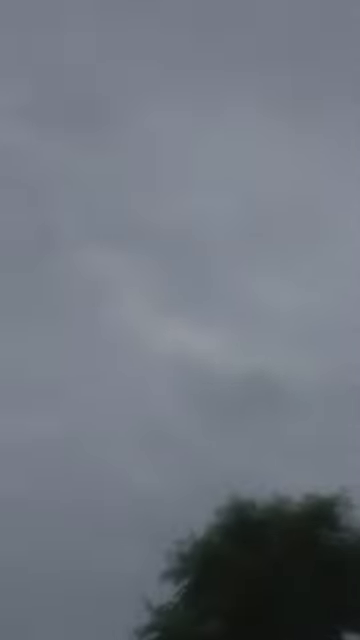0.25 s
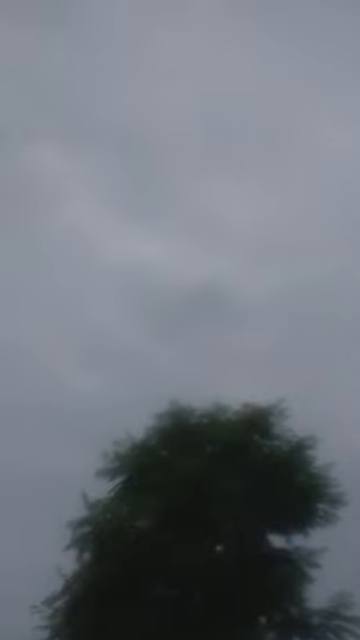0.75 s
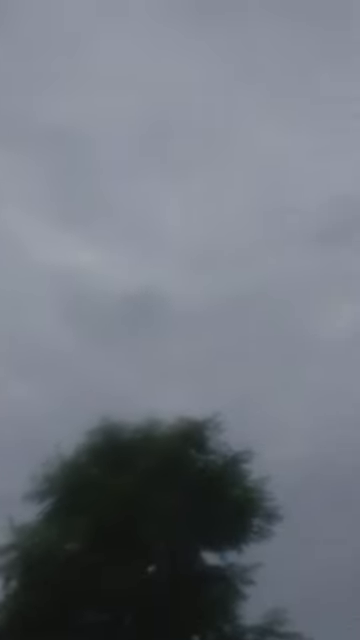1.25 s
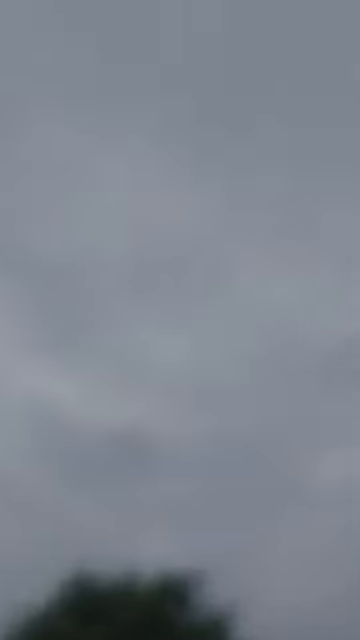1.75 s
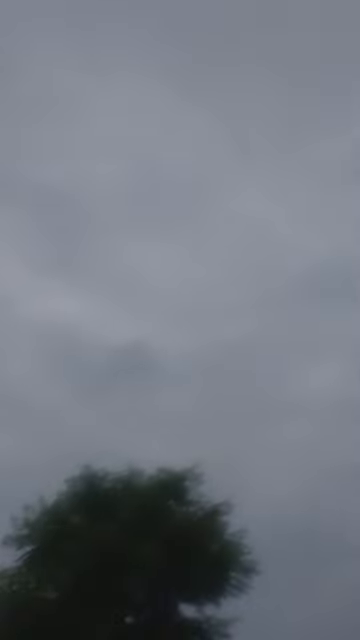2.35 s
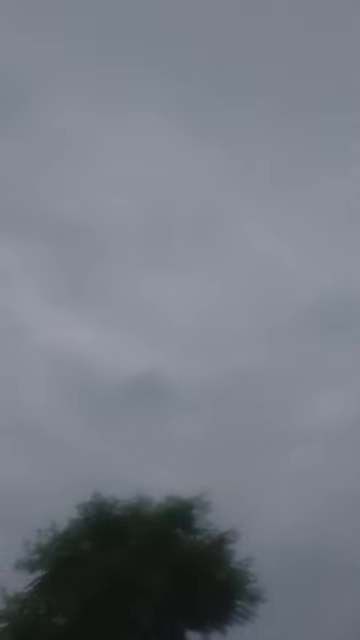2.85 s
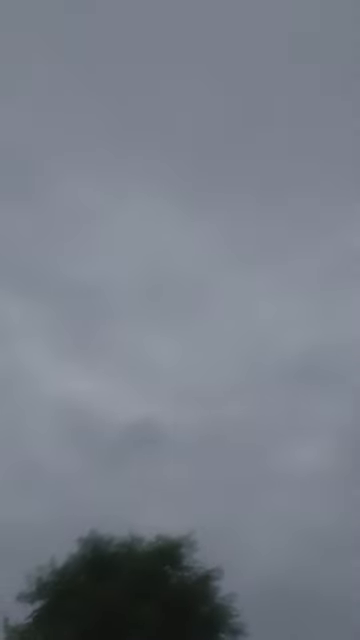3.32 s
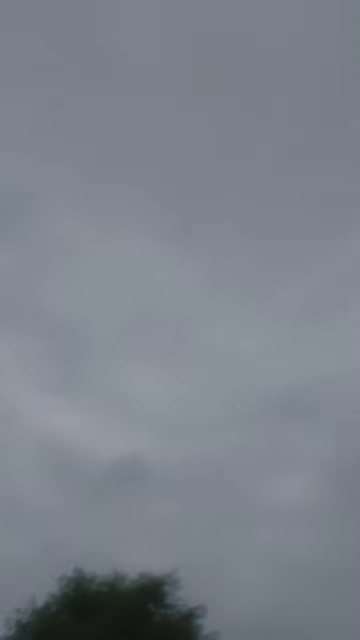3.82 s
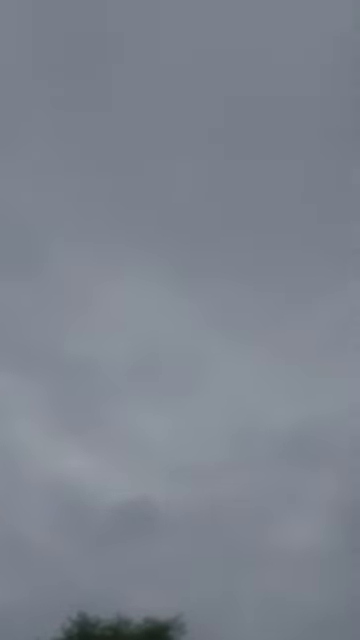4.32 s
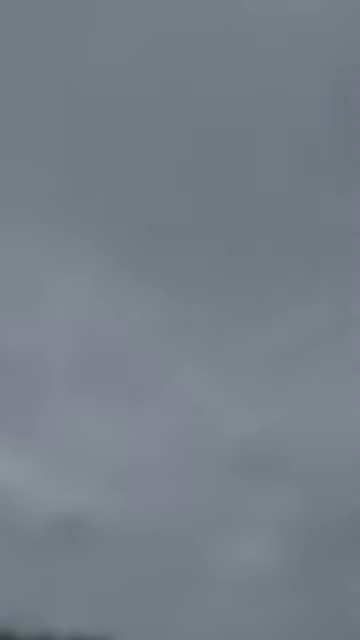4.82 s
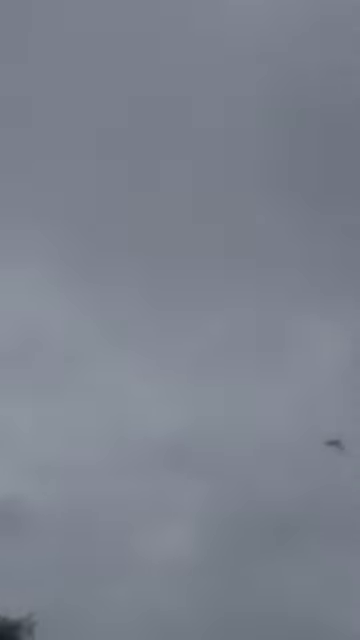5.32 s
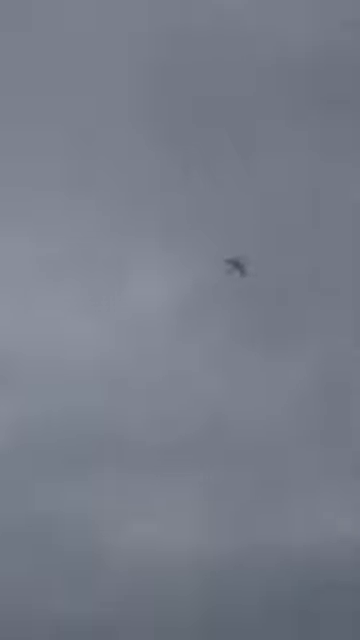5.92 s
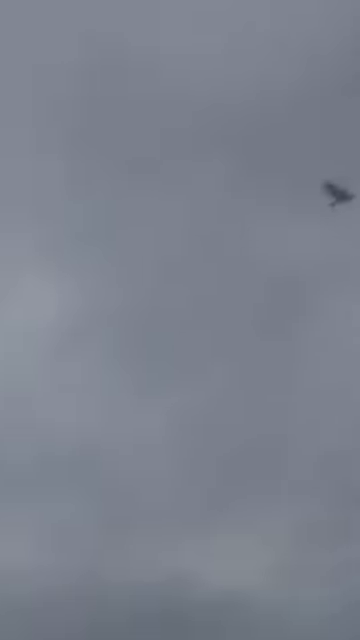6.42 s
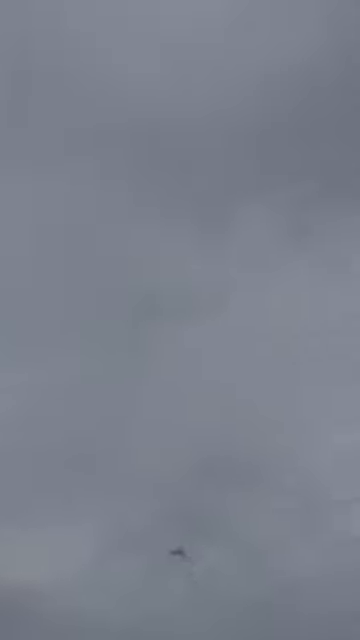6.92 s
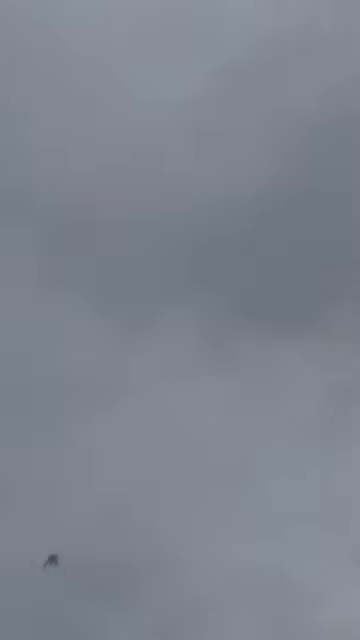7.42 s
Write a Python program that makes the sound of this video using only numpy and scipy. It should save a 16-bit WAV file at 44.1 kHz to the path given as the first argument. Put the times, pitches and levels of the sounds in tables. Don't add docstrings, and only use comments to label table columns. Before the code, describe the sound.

A crow is already mid-caw at the start; a loud, rattling near caw follows at 0.3 s, overlapped by another at 0.6, then more at 1.0 and 1.5, with a hazy far flock echoing among trees. Wind rumbles on the hand-held microphone, and small birds chip and trill faintly. A burst of finger ticks and a knock comes around 1.8-1.9. The breeze drops from 2.3 to 3; softer caws, short croaks and hoarse, sinking yelps alternate, strongest at 3.5 and 3.9. Crows caw at 3.8 and 4.7; a sharp click and gust hit at 4.1, with crackles after. A motorbike putters in faintly from 3.9, tyres passing near 6.2, its whine falling after 6.5 as it slows to idle. From 5.5 a small bird repeats a rapid whistled phrase, growing louder. Strong caws sound at 6.4 and 7.1, with cloth swishes and a final knock at 7.1.

```python
import sys
import numpy as np
from scipy import signal
from scipy.fft import rfft, irfft, next_fast_len
from scipy.io import wavfile
from scipy.ndimage import uniform_filter1d, map_coordinates

SR = 44100
rng = np.random.default_rng(int(sys.argv[2]) if len(sys.argv) > 2 else 0)


def boost(x):
    u = np.asarray(x, float) / 20
    return 10 ** u


def materialize(psi):
    bounded = np.clip(np.atleast_2d(psi).T, -1, 1)
    quanta = np.round(bounded * 32767).astype(np.int16)
    wavfile.write(sys.argv[1], SR, quanta)


N = 337806
T = np.arange(N) / SR

# (frequency [Hz], density [dB per Hz])
TRAFFIC = [(71, -28), (120, -3), (276, -1), (603, -6.5), (720, -7), (915, -4.5), (1000, -8.5), (1300, -6),
           (2200, -120)]
# (frequency [Hz], density [dB per Hz])
FRICTION = [(1180, -51.5), (2000, -1), (2460, -5), (2980, -2), (3980, -4.5), (4260, -2), (5030, -2.5),
            (6090, -12.5), (7060, -23.5), (8550, -29), (10600, -22.5), (12900, -19), (16000, -22)]


def level(x, db):
    return x * boost(db) / np.sqrt(np.mean(x ** 2))


def colour(x, points):
    hz, db = np.transpose(points)
    size = next_fast_len(len(x))
    f = np.arange(size // 2 + 1) * SR / size + 1
    gain = boost(np.interp(np.log(f), np.log(hz), db, left=-90, right=-90))
    return irfft(rfft(x, size) * gain, size)[:len(x)]


def walk(rate, size=N):
    k = max(int(SR / rate), 1)
    steps = np.repeat(rng.standard_normal(size // k + 1), k)
    return 1.3 * uniform_filter1d(uniform_filter1d(steps, k), k)[:size]


def add(out, s, x):
    i = int(s * SR)
    x, i = x[max(-i, 0):], max(i, 0)
    out[i:i + len(x)] += x[:len(out) - i]


def fade(size, edge_s):
    i = np.arange(size)
    return np.clip(np.minimum(i, size - i) / (edge_s * SR), 0, 1)


def trees(x, t60, db):
    t = T[:SR]
    tail = rng.standard_normal(SR) * boost(-60 * t / t60) * np.clip(t / .03, 0, 1)
    return x + boost(db) * signal.fftconvolve(x, tail / np.sqrt(np.sum(tail ** 2)))[:N]


def syrinx(hz, rattle_hz, rough, swing=.066, depth=.35):
    size = len(hz)
    rattle = 2 * np.pi * np.cumsum(rattle_hz * (1 + 0.2 * rough * walk(60.4, size))) / SR
    flutter = 1 + swing * np.sin(rattle) + 0.0389 * rough * walk(300, size)
    phase = 2 * np.pi * np.cumsum(hz * flutter) / SR
    tone = np.zeros(size)
    for k in range(1, 31):
        overtone = np.cos(k * phase + .4 * k * k)
        if k < 9:
            overtone = overtone * boost(1.6 * walk(13, size))
        tone += overtone / np.sqrt(15)
    breath = rng.standard_normal(size) * (1 + 1.9 * np.cos(phase))
    return (1 + depth * np.cos(rattle + .8)) * (tone + .95 * rough * breath)


def crows():
    # (crow, time [s], length [s], level [dB], brightness [dB])
    caws = [("first", -.3, .43, -32, -6), ("near", .338, .32, -29, -7), ("behind", .57, .22, -33.5, -15.5),
            ("mate", 1.025, .41, -31.5, -10.5), ("quick", 1.53, .3, -37, -15), ("low", 2.13, .3, -45, -21),
            ("far", 2.63, 0.28, -56.5, -21), ("busy", 3.83, .37, -36, -13), ("again", 4.67, .36, -40, -17),
            ("high", 5.75, .32, -48.5, -12), ("sharp", 6.4, .285, -33, -11),
            ("last", 7.07, .47, -34.5, -14)]
    voices = {"near": (510, 75, 0.16, 0.99, 1.5, .14, 0.37, 8.9),
              "mate": (505, 79, 0.36, 0.97, -1, -.03, .65, 15.5),
              "busy": (505, 70, .2, 1.05, 0, .04, .5, 10), "quick": (518, 92, .2, .94, -9, -.04, 0.5, 14.5),
              "low": (492, 70, 0.36, 0.98, -3, 0.15, .55, 10.5),
              "far": (480, 70.5, 0.1, 1.05, -4, .01, -1, 13),
              "sharp": (505, 74, .16, 1.29, 2, .14, 0.29, 18),
              "last": (512, 78, .2, 1.046, 5.8, .03, 0.47, 25),
              "first": (510, 75, 0.21, 0.983, 1.8, .05, .4, 17),
              "behind": (500, 75, .25, .95, 6.7, .01, 0.35, 34),
              "again": (490, 75, .16, 1.03, 1.5, .08, 0.39, 13.4),
              "high": (480, 70, 0.4, 1, -5.5, .03, 0.6, 8)}
    leans = {"quick": (-9, 8), "sharp": (-1, 9), "busy": (4, 0), "again": (2, -3), "mate": (-2, 0)}
    # (frequency [Hz], density [dB per Hz])
    throat_shape = [(410, -58), (700, -29.5), (798, -29.5), (904, -9.5), (1050, -6.5), (1250, -4.5),
                    (1490, -1), (1660, 5.5), (1940, 4.5), (2270, -6), (3100, -26), (4030, -55),
                    (6820, -120)]
    # (frequency [Hz], density [dB per Hz])
    beak_shape = [(1760, -35), (3000, -6.5), (3260, -18), (3780, 1.5), (4080, -3.5), (4500, -11),
                  (5200, -3.5), (5750, -10), (6500, -19.5), (7720, -31.5), (8340, -43), (9940, -49),
                  (11000, -36.5), (14300, -30), (16000, -40.5)]
    # (time [s], length [s], pitch [Hz], level [dB])
    croaks = [
        (0.163, 0.1, 567, -50),
        (2.476, 0.097, 596, -53),
        (2.921, 0.13, 600, -52),
        (3.05, 0.16, 642, -61),
        (3.356, .13, 596, -43.5),
        (3.802, 0.12, 599, -49),
        (4.281, 0.13, 596, -50),
    ]
    # (frequency [Hz], density [dB per Hz])
    croak_shape = [(410, -45.5), (700, -27.5), (1070, -11.5), (1170, -2), (1490, -9), (1620, -12.5),
                   (1760, 0), (2740, 0), (3310, -24.5), (4170, -41), (5000, -39.5), (6500, -70),
                   (11000, -120)]
    attack_s, release_s = 0.087, 0.086
    pitch_rise, pitch_fall = .13, .15
    throat_sinks_db = 4
    beak_shuts_s, beak_opens_db = 0.064, 12
    out = np.zeros(N)

    def throat_at(voice, crow, tilt_db):
        chest_db, nasal_db = leans.get(crow, (0, 0))
        shape = []
        for hz, g in throat_shape:
            lean_db = chest_db * (hz < 1200) + nasal_db * (hz > 2250)
            shape.append((hz, g + lean_db + tilt_db * max(np.log2(hz / 1600), -.25)))
        return level(colour(voice, shape), 0)

    for crow, s, length, db, bright_db in caws:
        top_hz, rattle_hz, rough, stretch, tilt_db, rise, open_at, sag_db = voices[crow]
        t = T[:int(length * SR)]
        u = t / length
        edges = np.minimum(np.minimum(t / attack_s, (length - t) / release_s), 1)
        swell = edges * boost(-sag_db * t)
        bend = pitch_rise + (pitch_fall - pitch_rise) * u
        arch = 1 - bend * (1 - np.sin(np.pi * u ** .62) ** .85)
        voice = syrinx(np.full(2 * len(t), 1. * top_hz), rattle_hz, rough)
        rasp = (voice + .6 * rng.standard_normal(len(voice))) * boost(1.5 * walk(45, len(voice)))
        sinking = np.clip(np.arange(len(voice)) / len(t), 0, 1)
        throat = (1 - sinking) * throat_at(voice, crow, tilt_db + throat_sinks_db)
        throat += sinking * throat_at(voice, crow, tilt_db - throat_sinks_db)
        beak = [(hz * stretch if hz < 9000 else hz, g) for hz, g in beak_shape]
        bright = level(colour(rasp, sorted(beak)), 0)
        place = [np.cumsum(arch)]
        gape = [np.cumsum(np.sqrt(arch) * (1 + rise * (u - .5)))]
        opening = boost(bright_db - beak_opens_db * np.abs(u - open_at))
        opening = opening * np.clip((length - t) / beak_shuts_s, 0, 1)
        call = map_coordinates(throat, place) + opening * map_coordinates(bright, gape)
        add(out, s, call * boost(db + 1.5) * swell)
    for s, length, hz, db in croaks:
        u = np.linspace(0, 1, int(length * SR))
        voice = syrinx(hz * (1 - .03 * u), 60, 0.5, swing=0.04, depth=0.7)
        croak = level(colour(voice, croak_shape), db)
        add(out, s, croak * fade(len(u), 0.02) * boost(2.5 * walk(60, len(u))))
    return out


def yelps():
    # (time [s], length [s], second harmonic at start [Hz], second harmonic held [Hz],
    # level [dB], high overtones [dB])
    calls = [(1.931, 0.15, 1470, 1350, -49, -13), (2.07, 0.12, 1720, 1545, -43.5, 2),
             (2.574, 0.12, 1890, 1475, -49.5, 1.5), (2.628, .05, 1750, 1500, -52, -20),
             (2.66, .25, 1450, 1460, -56, -20), (3.022, 0.17, 1935, 1480, -40, -13),
             (3.466, 0.14, 1914, 1508, -34, -14), (3.937, .12, 1577, 1447, -31.5, -15),
             (4.405, 0.12, 1645, 1375, -39, 11), (4.44, 0.065, 1674, 1504, -44, -25),
             (2.17, 0.23, 1445, 1430, -54, -21)]
    # (multiple of the pitch, level [dB])
    overtones = [(3, -32), (4, -11), (5, -40), (6, -28), (8, -29)]
    overtone_db, pure_from_db, purer_per_db = -1, -41.5, 1
    rich_below_hz, richer_db_per_hz = 1450, .17
    drop_s, hoarse, flutter_db = .016, .015, 2.3
    out = np.zeros(N)
    for s, length, start_hz, held_hz, db, top_db in calls:
        odd_db = richer_db_per_hz * max(rich_below_hz - held_hz, 0)
        over_db = overtone_db - purer_per_db * max(db - pure_from_db, 0)
        t = T[:int(length * SR)]
        hz = held_hz * (1 - .35 * t) + (start_hz - held_hz) * np.exp(-t / drop_s)
        phase = np.pi * np.cumsum(hz * (1 + hoarse * walk(250, len(t)))) / SR
        tone = np.sin(2 * phase)
        onset = np.clip(t / .03, 0, 1) ** 2
        for k, g in overtones:
            high_db = ((k > 4) + .3 * (k == 4)) * top_db
            rich_db = ((k == 5) - 1. * (k == 8)) * odd_db
            decay = np.exp(-k * t / .65)
            tone += boost(g + over_db + high_db + rich_db) * decay * np.sin(k * phase) * onset
        swell = np.sin(np.pi * (t / length) ** .8) ** .55
        add(out, s, 1.6 * tone * swell * boost(db + flutter_db * walk(90, len(t))))
    return out


def hands():
    # (time [s], push length [ms], signed
    knocks = [(1.82398, .24, .8), (1.8293, 2.62, -.9), (4.08946, .55, -1.15), (7.0893, .22, -1.3),
              (7.08966, 2.31, -.45), (5.26084, .62, .37), (6.0533, .88, -.25), (4.33642, .84, .23),
              (7.43159, 1.13, .06), (1.82382, .08, .45), (4.08965, .09, -.6), (4.08932, .13, .55),
              (7.08926, .08, -.3), (7.08985, .15, -.2),
              (1.392, 2., .08), (2.501, 1.2, .018), (4.22, .9, .07), (4.645, 1.5, .05),
                   (5.101, 1.4, .06), (6.484, 1.4, .12), (1.875, 1.5, .08), (1.095, 1.1, .03),
                   (1.765, 1.1, .04), (2.13, .8, .006), (5.2605, .25, .07), (6.0537, .3, -.06)]
    # (corner [Hz], Q)
    low_cut = [(85, 1.48), (57.6, 3), (161, .75)]
    # (time [s], peak [dB], nail brightness [dB])
    finger_ticks = [(0.225, -35, -3), (1.778, -24, 0), (1.7924, -29, -3), (1.8114, -27, 12),
                    (1.818, -41, -6), (1.8408, -29, -6), (1.8773, -37, -3), (1.8895, -29, -6),
                    (1.913, -36, -3), (1.9295, -32.5, -7), (4.1804, -36, -1), (5.2041, -43, -3),
                    (5.2599, -29.5, -8), (5.713, -37, -5)]
    # (frequency [Hz], density [dB per Hz])
    tick_shape = [(470, -35), (800, 7), (1340, 7), (2130, 5.5), (4290, -3), (4990, -7.5), (5580, -12.5),
                  (8440, -40), (13800, -14.5), (16000, -29)]
    # (time [s], peak [dB], treble [dB])
    nail_snaps = [(1.7786, -23, 8), (1.7803, -23, 8), (1.8238, -17, 10), (4.0894, -12.5, 1.5),
                  (7.0894, -30, -4), (4.2342, -26.5, 3), (4.244, -28, 5), (4.2457, -29, 8),
                  (4.2472, -31, 8), (4.2486, -33, 5), (4.254, -30, 3), (4.2657, -28, 5), (4.272, -32, 3),
                  (5.4495, -34, -6), (6.1797, -29, -14), (6.0535, -39, -8), (2.1273, -37.5, -8),
                  (3.482, -44, -10)]
    crackle_ms = 0.57
    push, ticks, t = np.zeros(N), np.zeros(N), T[:1000]
    for s, ms, size in knocks:
        add(push, s - t[500], size * np.exp(-.5 * ((t - t[500]) * 1000 / ms) ** 2))
    for hz, q in low_cut:
        w = 2 * np.pi * hz
        push = signal.lfilter(*signal.bilinear([1, 0, 0], [1, w / q, w * w], SR), push)
    for s, db, nail_db in finger_ticks:
        snap = rng.standard_normal(1000) * np.exp(-t * 1000 / crackle_ms) + 3 * (t == 0)
        shape = [(hz, g + nail_db * (hz > 8000)) for hz, g in tick_shape]
        crackle = colour(np.roll(snap, 200), shape)
        add(ticks, s + .0006 - t[200], boost(db) * crackle / np.abs(crackle).max())
    for s, db, nail_db in nail_snaps:
        shape = [(hz, g + nail_db * (hz > 9000)) for hz, g in FRICTION]
        snap = colour(1. * (t == t[500]), shape)
        add(ticks, s - t[500], boost(db) * snap / np.abs(snap).max())
    return push + ticks


def chirp(length, from_hz, to_hz):
    size = int(length * SR)
    phase = 2 * np.pi * np.cumsum(np.linspace(from_hz, to_hz, size)) / SR
    return np.sin(phase) * np.hanning(size)


def small_birds():
    # (delay [s], length [s], from [Hz], to [Hz], level [dB])
    phrase = [
        (0, 0.017, 4520, 4030, -14.5),
        (0.019, 0.0158, 5010, 4620, -3),
        (0.043, 0.0099, 4160, 4850, -10.5),
        (0.053, 0.016, 4900, 4550, -6),
        (0.073, .007, 5290, 4750, -7.5),
        (.081, .012, 5480, 5620, -15),
        (0.09, 0.0147, 5600, 6630, -15),
        (0.107, .012, 5550, 5700, -21),
    ]
    # (time [s], level [dB])
    phrases = [
        (5.454, -47),
        (5.753, -46.5),
        (6.053, -43),
        (6.357, -39),
        (6.669, -37.5),
        (6.978, -37),
    ]
    # (time [s], length [s], level [dB])
    trills = [
        (.7, 0.19, -59),
        (1.47, 0.2, -57),
        (2.25, .17, -72),
        (3.0, 0.2, -67),
        (3.682, 0.28, -68),
        (4.379, 0.19, -64),
        (5.05, 0.22, -75),
    ]
    # (time [s], length [s], from [Hz], to [Hz],
    # level [dB])
    chips = [(.735, .05, 3620, 3540, -54), (0.78, .018, 4350, 3900, -52), (.795, .022, 4500, 4100, -47),
             (.795, .04, 3320, 3150, -50.5), (.835, .018, 3930, 4550, -52), (0.847, .03, 4950, 4750, -52),
             (0.888, .02, 5740, 6300, -60), (2.068, .014, 2200, 1620, -48), (2.632, .008, 1700, 1500, -44),
             (2.06, .025, 3650, 3450, -55), (5.411, 0.024, 3660, 3560, -62.5)]
    out = np.zeros(N)
    for s, db in phrases:
        for delay, length, from_hz, to_hz, note_db in phrase:
            pitch = 1 + .006 * rng.standard_normal()
            gain = boost(db + note_db + 4.5 + 2.0 * rng.standard_normal())
            add(out, s + delay, gain * chirp(1.28 * length, from_hz * pitch, to_hz * pitch))
    for s, length, db in trills:
        for u in np.linspace(0, 1, 11):
            delay = length * (.7 * u + 0.25 * u * u)
            add(out, s + delay, boost(db - 1.0 + 4.2 * u) * chirp(0.01, 5650, 4750))
    for s, length, from_hz, to_hz, db in chips:
        add(out, s, boost(db) * chirp(length, from_hz, to_hz))
    return out


def screeches():
    # (time [s], length [s], from [Hz], to [Hz], level [dB])
    calls = [
        (3.6, .45, 3050, 3000, -55),
        (3.1, .3, 3300, 4100, -66),
        (3.35, .3, 5700, 6200, -73),
        (5.75, .4, 4200, 4300, -63),
    ]
    out = np.zeros(N)
    for s, length, from_hz, to_hz, db in calls:
        size = int(length * SR)
        hz = np.linspace(from_hz, to_hz, size) * (1 + .05 * walk(700, size))
        whistle = np.sin(2 * np.pi * np.cumsum(hz) / SR)
        add(out, s, boost(db + 1.8 * walk(70, size)) * whistle * fade(size, min(0.028, length / 2)))
    return out


def motorbike():
    # (time [s], firing rate [Hz], level [dB])
    engine = [
        (3.2, 27.97, -74),
        (3.9, 27.71, -48),
        (4.4, 27.55, -46),
        (4.9, 27.11, -51.5),
        (5.3, 26.67, -56),
        (6.0, 26.3, -53.5),
        (6.55, 25.4, -51.5),
        (6.93, 23.61, -59.5),
        (7.66, 23.87, -54.5),
    ]
    # (frequency [Hz], gain [dB])
    exhaust = [(40, -24.5), (90, -9), (160, 4.5), (220, -3.5), (280, -2.5), (330, -17), (390, -5.5),
               (520, -31.5), (900, -27)]
    whine_top_hz, brakes_s, slows_hz_per_s = 930, 6.55, 560
    whine_top_db, nears_db_per_s, stops_s, dies_db_per_s = -52, 6, 6.75, 60
    tyres_db, pass_s, pass_width_s = -50, 6.23, 1.1
    s, *columns = np.transpose(engine)
    rate, db = (np.interp(T, s, c) for c in columns)
    turns = np.floor(np.cumsum(rate * (1 + .004 * walk(10))) / SR)
    firings = np.diff(turns, prepend=0) * boost(1.5 * rng.standard_normal(N))
    whine_hz = whine_top_hz - slows_hz_per_s * np.clip(T - brakes_s, 0, .6)
    whine_db = whine_top_db - nears_db_per_s * np.abs(T - brakes_s)
    whine_db = whine_db - dies_db_per_s * np.maximum(T - stops_s, 0)
    whine_phase = 2 * np.pi * np.cumsum(whine_hz * (1 + .016 * walk(120))) / SR
    whine = np.sin(whine_phase) * boost(2.7 * walk(40))
    tyres = level(colour(rng.standard_normal(N), TRAFFIC), tyres_db)
    tyres = tyres / (1 + ((T - pass_s) / pass_width_s) ** 2)
    return level(colour(firings, exhaust), 0) * boost(db) + whine * boost(whine_db) + tyres


def flock(near, count=34):
    # (time [s], level [dB])
    flock_swell = [(0, -55), (1.0, -55), (1.8, -46.5), (2.6, -62), (3.3, -51), (4.3, -49.5), (5.1, -52.5),
                   (5.75, -55.5), (6.2, -50), (7.3, -53.5), (7.66, -63)]
    # (frequency [Hz], density [dB per Hz])
    far_shape = [(350, -28.5), (600, -10), (715, -13.5), (887, -7), (1320, 3), (1450, 3.5), (1860, 5.5),
                 (2560, -14), (2800, -12.5), (3590, -17), (4940, -22), (6120, -31.5), (7000, -42),
                 (9100, -71), (15400, -120)]
    follow_db, follow_s = -12.5, 0.17
    out = 0.37 * rng.standard_normal(N)
    for s, length, pitch, size in rng.random((count, 4)):
        u = np.linspace(0, 1, int((.25 + 0.198 * length) * SR))
        hz = (440 + 70 * pitch) * (1 + .07 * np.sin(np.pi * u))
        caw = syrinx(hz, 65 + 25 * size, 0.398) * np.sin(np.pi * u)
        add(out, s * N / SR, caw * boost(-8 * size))
    out = colour(trees(out, 0.53, 2.3), far_shape)
    even = out / uniform_filter1d(out ** 2, SR // 4) ** .45
    near_power = uniform_filter1d(near ** 2, int(follow_s * SR))
    follow = boost(follow_db) * np.sqrt(np.abs(near_power))
    return level(even, 0) * (boost(np.interp(T, *np.transpose(flock_swell))) + follow)


def air():
    # (time [s], strength [dB])
    breeze_points = [(0, 2.5), (.3, 0.5), (.53, -0.5), (.79, -2), (1.1, -0.5), (1.8, 0.5), (1.95, -5),
                     (2.3, -21.5), (2.9, -21.5), (3.25, -7.5), (3.5, -8.5), (4.2, 3.5), (4.5, -7),
                     (5.2, -8.5), (5.5, -4.5), (7.1, 1.5), (7.66, -7)]
    # (frequency [Hz], density [dB per Hz])
    wind_shape = [(15, -45.5), (25, -21), (45, -0.5), (92, 8.5), (178, -6), (279, -16), (317, -30),
                  (356, -14), (400, -18.5), (520, -47.5), (880, -120)]
    # (time [s], length [s], level [dB])
    gusts = [
        (.05, 0.22, -55),
        (0.252, 0.23, -52),
        (0.754, 0.27, -54),
        (0.947, 0.19, -52),
        (1.41, 0.29, -48.5),
        (2.95, 0.21, -64),
        (4.087, 0.22, -37),
    ]
    # (time [s], length [s], level [dB])
    swishes = [
        (6.84, 0.17, -47),
        (6.4, 0.22, -50),
        (7.2, 0.28, -59),
        (1.76, 0.19, -61),
        (4.243, 0.007, -45),
    ]
    wind_db, hum_db, rub_db = -54.5, -54, -58
    wind_slope, hum_slope, rub_slope = 0.81, 0.77, 1.06
    breeze = np.interp(T, *np.transpose(breeze_points))
    blow = boost(wind_db + wind_slope * breeze)
    rub = boost(rub_db + rub_slope * breeze)
    for s, length, db in gusts:
        add(blow, s, boost(db) * np.hanning(int(length * SR)))
    for s, length, db in swishes:
        add(rub, s, boost(db) * fade(int(length * SR), length / 6))
    wind = level(colour(rng.standard_normal(N) * boost(3.6 * walk(15)), wind_shape), 0)
    hum = level(colour(rng.standard_normal(N), TRAFFIC), 0)
    rustle = level(colour(rng.standard_normal(N) * boost(2.2 * walk(300)), FRICTION), 0)
    return wind * blow + hum * boost(hum_db + hum_slope * breeze) + rustle * rub


def scene():
    near = crows()
    birds = trees(near, 0.46, -7.5) + trees(yelps(), 0.48, -7.5)
    birds += trees(small_birds() + screeches(), .3, -9.5)
    return (birds + hands() + motorbike() + flock(near) + air())[None]


def band_limit(x):
    return signal.sosfilt(signal.butter(12, 16850, fs=SR, output="sos"), x)


def record(dry):
    top_cut = signal.butter(10, 16300, fs=SR, output="sos")
    mix = signal.sosfilt(top_cut, np.clip(dry, -.97, .97))
    return band_limit(mix)


dry = scene()
out = record(dry)
materialize(out)
```